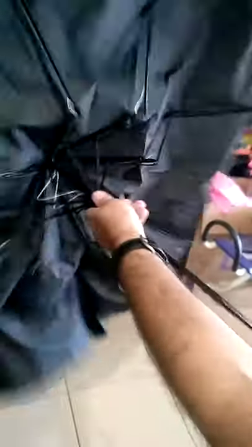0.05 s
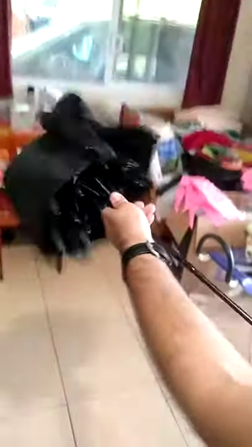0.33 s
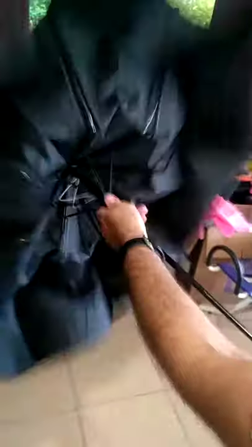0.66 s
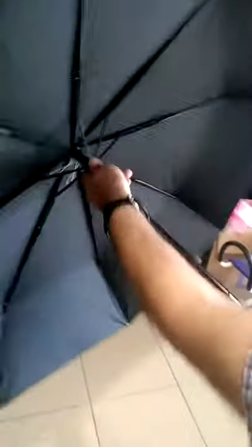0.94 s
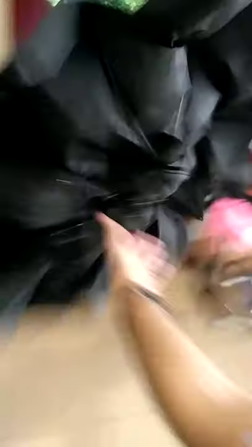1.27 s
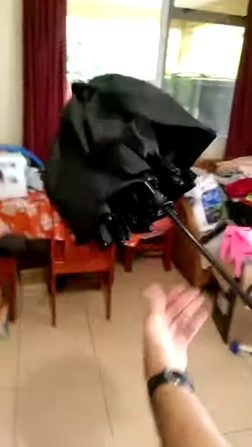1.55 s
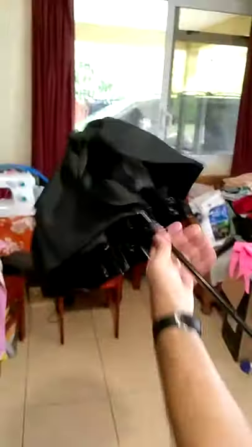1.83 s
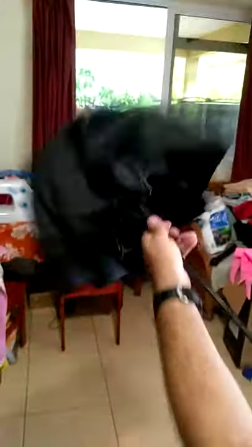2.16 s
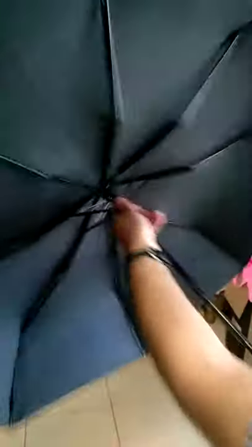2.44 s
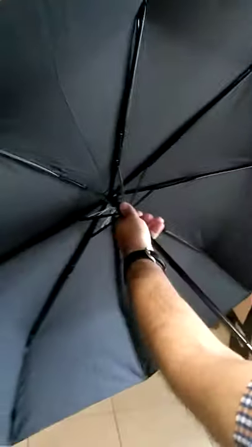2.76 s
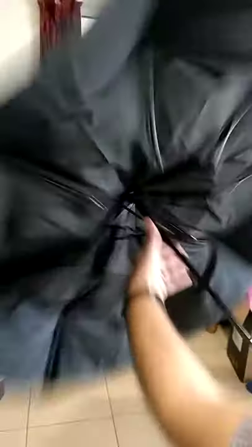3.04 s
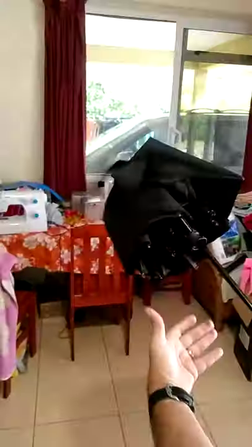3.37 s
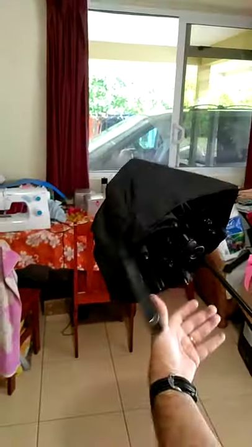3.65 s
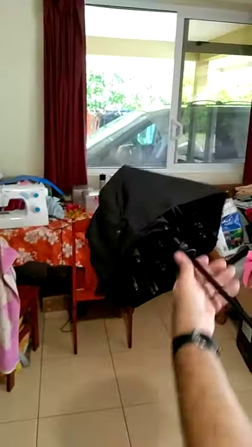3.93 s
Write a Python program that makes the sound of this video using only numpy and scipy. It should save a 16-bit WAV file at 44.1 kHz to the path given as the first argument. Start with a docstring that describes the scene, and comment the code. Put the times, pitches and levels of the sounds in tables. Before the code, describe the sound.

A folding umbrella is collapsed and pushed open repeatedly, nylon rustling and metal ribs clinking.

```python
"""A quiet room: a folding umbrella is collapsed three times and pushed open twice, at arm's length. The nylon
rubs, rasps, crumples and billows, then snaps taut and booms. The thin metal ribs clink at their joints; the
plastic runner knocks and slides on the shaft. Mains hum and faint room noise lie underneath."""
import sys
import numpy as np
from scipy import signal
from scipy.fft import rfft, irfft, next_fast_len
from scipy.io import wavfile
from scipy.ndimage import uniform_filter1d

SR = 44100
rng = np.random.default_rng(int(sys.argv[2]) if len(sys.argv) > 2 else 0)


def generate_wav(sig):
    """Save sig (samples, or channels by samples) to the path in sys.argv[1] as 16-bit PCM at SR."""
    pcm = np.round(np.clip(np.atleast_2d(sig).T, -1, 1) * 32767).astype(np.int16)
    wavfile.write(sys.argv[1], SR, pcm)


N = 176400

# Canopy movements: t/s, rub/dB, crumple/dB, billow/dB
CLOSE_1 = [(0, -33, -39, -32.5), (.1, -50, -56.5, -52.5), (.17, -49, -42.5, -46), (.22, -33.5, -38.5, -36),
           (.26, -24, -34, -42.5), (.31, -32.5, -40.5, -54), (.42, -37, -50, -63), (.47, -34, -47.5, -66)]
OPEN_1 = [(.52, -31.5, -52, -68), (.575, -28, -48, -59), (.6, -27, -42, -38), (.7, -45.5, -35.5, -40.5),
          (.755, -38.5, -40, -36.5), (.82, -69, -48.5, -44.5), (.87, -49, -47, -38.5),
          (.94, -47, -51, -41.5), (1.02, -65, -58, -53.5), (1.09, -66, -68, -57.5)]
CLOSE_2 = [(1.15, -43, -51, -55), (1.221, -40, -44.5, -34.5), (1.265, -31, -42, -41),
           (1.315, -31.5, -35.5, -41.5), (1.338, -31, -29.5, -37.5), (1.39, -27, -33.5, -37.5),
           (1.46, -37, -42, -63), (1.55, -46.5, -57, -69), (1.68, -66, -55, -59)]
GRIP_SHIFT = [(1.8, -64.5, -58, -65), (1.85, -44, -55, -59), (1.98, -58, -63.5, -64.5),
              (2.07, -50.5, -62, -66)]
OPEN_2 = [(2.13, -36, -56.5, -67), (2.23, -28.5, -50.5, -69), (2.294, -26, -42, -45.5),
          (2.306, -24.5, -32, -32), (2.36, -35.5, -33, -32), (2.407, -28.5, -35, -28.5),
          (2.45, -38.5, -39, -33), (2.501, -36.5, -48, -35), (2.6, -64, -62, -54),
          (2.69, -60.5, -67.5, -63)]
CLOSE_3 = [(2.81, -64, -68, -63), (2.86, -51, -54, -51.5), (3.029, -44.5, -62, -52.5),
           (3.073, -27, -46, -39), (3.125, -36, -32.5, -42), (3.155, -36, -32.5, -42),
           (3.191, -27.5, -33, -38.5), (3.29, -39, -46.5, -82)]
SETTLE = [(3.41, -48, -54, -73), (3.53, -44.5, -55.5, -63.5), (3.62, -49.5, -58, -61),
          (3.73, -52, -56.5, -60), (3.81, -60, -66, -59), (4, -66, -70, -84.5)]

# Panel snaps: t/s, flap/dB, crack/dB, hold/s
PANEL_SNAPS = [(0.2283, -34.5, -28.5, 0.004), (.736, -35, -41, .002), (.754, -31.5, -36, 0.0023),
               (.895, -31, -35.5, .002), (0.926, -32.5, -42, .002), (1.217, -37, -52, 0.0062),
               (1.329, -29, -25, 0.0069), (2.303, -30, -43, 0.011), (2.315, -32, -31, 0.0043),
               (2.36, -28, -33, 0.0024), (2.394, -30.5, -35.5, 0.013), (2.423, -31, -31, 0.0027),
               (2.466, -25.5, -50, 0.0022), (3.186, -39, -33.5, 0.0072)]
# Canopy booms: t/s, level/dB, f/Hz
CANOPY_BOOMS = [(0.896, -13.5, 156), (2.399, -26, 150), (2.463, -16.5, 195)]
# Canopy resonances: f/Hz, relative level/dB
BODY_MODES = [(195, -14), (381, -16.5), (663, -47), (758, -14), (1000, -36), (1376, -34), (1750, -12.5),
              (2540, -26), (3160, -8)]
# Rib joint clinks: t/s, relative level/dB, contact/s
RIB_CLINKS = [(0.0448, -27, .004), (.147, -35, 0.0032), (.118, -28, 0.0023), (.1647, -13.5, 0.0021),
              (0.1802, -13.5, .002), (0.188, -18, 0.0042), (0.243, -23.5, 0.0077), (0.4713, -24, .0025),
              (.6555, -35, 0.0022), (.731, -33, .002), (0.7623, -20, 0.0017), (.888, -27.5, 0.0042),
              (0.898, -33.5, 0.011), (1.104, -35.5, .003), (1.174, -17.5, 0.0028), (1.257, -22, 0.0049),
              (1.27, -22, 0.0046), (1.293, -17, 0.0032), (1.299, -13.5, 0.0026), (1.306, -14.5, 0.0017),
              (1.4943, -26, 0.0028), (1.851, -37.5, 0.0061), (1.9985, -41, 0.0019), (2.037, -37, 0.0038),
              (2.079, -38, 0.0023), (2.0988, -31.5, 0.0031), (2.388, -23.5, 0.0019), (2.4683, -30, .003),
              (2.479, -33, .006), (2.763, -53.5, .003), (2.868, -28, .003), (2.89, -34.5, 0.0022),
              (2.9115, -15, 0.0017), (2.93, -27, 0.0044), (3.045, -30, 0.0025), (3.069, -17.5, 0.0023),
              (3.104, -8.5, 0.0035), (3.1777, -22, 0.0041), (3.663, -48, .008)]
# Runner and handle knocks: t/s, knock/dB, ring/dB, ring f/Hz
RUNNER_KNOCKS = [(0.166, -38, -33.5, 4420), (.356, -49, -39, 2400), (.422, -39.5, -46, 2740),
                 (.735, -31, -55, 3300), (.96, -29.5, -57, 3330), (1.106, -47, -49, 930),
                 (1.186, -53, -36.5, 3370), (1.25, -36, -36, 1970), (1.8215, -51, -53, 2800),
                 (2.847, -41, -45, 3200), (2.8703, -45.5, -54, 1000), (2.912, -46, -44, 2700),
                 (2.946, -43, -52, 3000), (3.354, -56, -41, 1240)]
# Friction strokes: centre t/s, level/dB, sigma/s
RASP_STROKES = [(.27, -33, 0.083), (0.575, -39, 0.066), (1.39, -50, 0.037), (2.278, -50.5, 0.035),
                (3.197, -55.5, .05)]
RUNNER_SLIDES = [(.53, -50, 0.049), (2.145, -45, 0.034), (2.24, -46.5, 0.058), (3.54, -60.5, 0.15)]
# Hum envelope: t/s, level/dB
HUM_LEVELS = [(0, -57), (.42, -59), (.53, -69), (.7, -71), (1.0, -56.5), (1.42, -58), (1.54, -64),
              (1.65, -54.5), (1.95, -56), (2.02, -61.5), (2.2, -63), (2.6, -54.5), (3.3, -60.5),
              (3.6, -53.5), (4, -59)]

# Spectra: f/Hz, relative level/dB
RUB_SPECTRUM = [(600, -34.5), (1500, -13.5), (2900, -5), (3900, -9), (6000, -10), (7500, -7), (9300, 0),
                (11300, 0), (13000, -3), (15700, -8.5)]
CRUMPLE_SPECTRUM = [(150, -12.5), (400, -6), (750, -3), (1050, 1), (1500, -2.5), (2200, -3.5), (3100, -5.5),
                    (4200, -13.5), (7000, -17.5), (15000, -14.5)]
BILLOW_SPECTRUM = [(35, -28), (70, -9.5), (120, -4), (195, -1.5), (280, -1.5), (380, -4.5), (520, -11),
                   (1000, -13), (3000, -51.5)]
PANEL_SPECTRUM = [(30, -29), (60, 5), (130, 0.5), (260, 1.5), (550, -6.5), (950, -0.5), (1600, -18),
                  (3000, -15.5), (6000, -41), (15000, -43)]
CLINK_SPECTRUM = [(500, -27), (2000, -24), (3200, -17.5), (4500, -13.5), (7000, -13.5), (8600, -0.5),
                  (9800, -3), (11100, 2), (13000, 1.5), (15700, -4.5)]
KNOCK_SPECTRUM = [(100, -10), (400, -6), (1000, 1), (1500, -10), (3300, -4), (5000, -10), (7000, -9.5),
                  (15000, -14.5)]
SCRAPE_SPECTRUM = [(1000, -14.5), (2200, -14), (4000, -6.5), (6000, 0), (8300, 6.5), (11000, -7.5),
                   (15500, -3)]
SHAFT_SPECTRUM = [(800, -26), (1500, -18), (2100, -3.5), (2800, 0.5), (3300, 1.5), (4000, -7), (8000, -36)]
REVERB_SPECTRUM = [(80, 0.5), (200, 1), (900, 0.5), (1700, 4.5), (3000, -2), (4200, -6), (6500, -1),
                   (9500, 4.5), (12000, -2.5), (15500, -1)]
AIR_SPECTRUM = [(25, -9), (70, 1), (200, 7.5), (500, -13), (2500, -7.5), (5000, -43), (10000, -16),
                (16000, -26)]


def cloth(trim_db=-0.5):
    """Moving nylon slips on itself, creases and flaps in many tiny events."""
    times_s, *levels_db = np.transpose(CLOSE_1 + OPEN_1 + CLOSE_2 + GRIP_SHIFT
                                       + OPEN_2 + CLOSE_3 + SETTLE)
    t = np.arange(N) / SR
    rub, crumple, billow = [from_db(np.interp(t, times_s, db) + trim_db) for db in levels_db]
    slips = grains(per_s=7000, spread_db=4.5, smooth_db=2)
    creases = grains(per_s=900, spread_db=3, smooth_db=-3)
    flaps = grains(per_s=220, spread_db=1, smooth_db=-0.5)
    return (coloured(rub * slips, RUB_SPECTRUM)
            + coloured(crumple * creases, CRUMPLE_SPECTRUM)
            + coloured(billow * flaps, BILLOW_SPECTRUM))


def panel_snaps(fall_s=0.0017):
    """Panels snap as they fill: a low flap plus a crisp crack."""
    flaps, cracks = np.zeros((2, N))
    t = np.arange(SR // 5) / SR
    for start_s, flap_db, crack_db, hold_s in PANEL_SNAPS:
        add(flaps, start_s, from_db(flap_db) * burst(t, hold_s, fall_s))
        add(cracks, start_s, from_db(crack_db) * burst(t, hold_s, fall_s))
    return coloured(flaps, PANEL_SPECTRUM) + coloured(cracks, CRUMPLE_SPECTRUM)


def canopy_booms(attack_s=0.0045, t60_s=0.05):
    """The taut canopy booms like a drum."""
    out, t = np.zeros(N), np.arange(SR // 5) / SR
    envelope = (1 - np.exp(-t / attack_s)) * from_db(-60 * t / t60_s)
    for start_s, db, hz in CANOPY_BOOMS:
        add(out, start_s, -from_db(db) * envelope * np.sin(2 * np.pi * hz * t))
    return out


def canopy_body(x, mix_db=-23):
    """Resonances of the canopy on its frame colour the cloth."""
    modes = sum(from_db(db) * ring(x, hz, t60_s=0.026) for hz, db in BODY_MODES)
    return x + from_db(mix_db) * modes


def rib_clinks(rise_s=0.0006, chatter_db=-15, chatter_fall_s=0.015, ring_db=-7, trim_db=-1.5):
    """Metal joints: a brief scrape and dying bounces excite each rib's own damped ring."""
    out, t = np.zeros(N), np.arange(SR // 6) / SR
    for start_s, db, hold_s in RIB_CLINKS:
        bounces = grains(per_s=600, spread_db=1, smooth_db=-7, size=len(t))
        scrape = burst(t, hold_s, fall_s=0.0008) * (1 - np.exp(-t / rise_s))
        contact = scrape + from_db(chatter_db) * bounces * np.exp(-t / chatter_fall_s)
        ring_hz = 10460 * np.exp(rng.uniform(-0.11, 0.1))
        clink = contact + from_db(ring_db) * ring(contact, ring_hz, t60_s=0.0017)
        add(out, start_s, from_db(db + trim_db) * clink)
    return coloured(out, CLINK_SPECTRUM)


def runner_knocks():
    """Runner and handle: dry plastic knocks, one damped ring each."""
    out, t = np.zeros(N), np.arange(SR // 10) / SR
    for start_s, knock_db, ring_db, ring_hz in RUNNER_KNOCKS:
        contact = burst(t, hold_s=0, fall_s=0.0099)
        knock = from_db(knock_db) * coloured(contact, KNOCK_SPECTRUM)
        add(out, start_s, knock + from_db(ring_db) * ring(contact, ring_hz, t60_s=0.006))
    return out


def cloth_rasp():
    """The nylon rasps on itself in small catches."""
    catches = grains(per_s=520, spread_db=-1.5, smooth_db=0)
    return coloured(swells(RASP_STROKES) * catches, SCRAPE_SPECTRUM)


def runner_slides():
    """The runner drags along the shaft in fine, dense catches."""
    catches = grains(per_s=3600, spread_db=1.5, smooth_db=1)
    return coloured(swells(RUNNER_SLIDES) * catches, SHAFT_SPECTRUM)


def room(x, first_echo_s=0.0028, t60_s=0.39):
    """Diffuse reverberation of a tiled living room."""
    t = np.arange(SR) / SR
    envelope = (t > first_echo_s) * from_db(-60 * t / t60_s)
    tail = coloured(envelope * rng.standard_normal(SR), REVERB_SPECTRUM)
    return signal.fftconvolve(x, tail / np.linalg.norm(tail))[:N]


def background(hum_hz=61.5, air_db=-64.5):
    """Wavering mains hum and faint room noise."""
    t = np.arange(N) / SR
    hum_db = np.interp(t, *np.transpose(HUM_LEVELS))
    hum = from_db(hum_db) * unit_rms(np.sin(2 * np.pi * hum_hz * t))
    return hum + from_db(air_db) * coloured(rng.standard_normal(N), AIR_SPECTRUM)


def grains(per_s, spread_db, smooth_db, size=N):
    """Random clicks of unequal size on smooth noise; rms 1."""
    clicks = (rng.random(size) < per_s / SR) * rng.choice([-1, 1], size)
    gains = from_db(spread_db * np.minimum(rng.exponential(1, size), 4))
    return unit_rms(unit_rms(clicks * gains) + from_db(smooth_db) * rng.standard_normal(size))


def burst(t, hold_s, fall_s):
    """Dense micro-contacts: hold, then exponential decay."""
    return rng.choice([-1, 1], len(t)) * np.exp(-np.maximum(t - hold_s, 0) / fall_s)


def swells(strokes):
    """Gain curve, one Gaussian per stroke."""
    t = np.arange(N) / SR
    return sum(from_db(db) * np.exp(-0.5 * ((t - centre_s) / sigma_s) ** 2)
               for centre_s, db, sigma_s in strokes)


def coloured(x, spectrum):
    """Minimum-phase filter; white noise keeps its power."""
    size = next_fast_len(len(x) + SR // 10, real=True) * 2
    hz, db = np.transpose(spectrum)
    bins_hz = np.fft.rfftfreq(size, 1 / SR)
    gain = unit_rms(from_db(np.interp(np.log(bins_hz + 1), np.log(hz), db)))
    cepstrum = irfft(np.log(gain))
    cepstrum[1:size // 2] *= 2  # fold onto positive time
    cepstrum[size // 2 + 1:] = 0
    return irfft(rfft(x, size) * np.exp(rfft(cepstrum)))[:len(x)]


def ring(x, hz, t60_s):
    """Two-pole resonator; white noise keeps its power."""
    radius, angle_rad = from_db(-60 / (t60_s * SR)), 2 * np.pi * hz / SR
    gain = np.sqrt((1 - radius ** 2) / 2)
    return signal.lfilter([gain, 0, -gain], [1, -2 * radius * np.cos(angle_rad), radius ** 2], x)


def add(out, start_s, sound):
    """Mix in place from start_s."""
    i = int(start_s * SR)
    out[i:i + len(sound)] += sound[:N - i]


def from_db(db):
    """Decibels to gain."""
    return 10 ** (np.asarray(db) / 20)


def unit_rms(x):
    """Scale to rms 1."""
    return x / np.sqrt(np.mean(x ** 2) + 1e-20)


def scene(rustle_send_db=-12.5, clatter_send_db=-7.5):
    """Umbrella, reverberation and background; mono."""
    canopy = canopy_body(cloth() + panel_snaps() + canopy_booms())
    rustle = canopy + cloth_rasp() + runner_slides()
    clatter = rib_clinks() + runner_knocks()
    reverb = room(from_db(rustle_send_db) * rustle + from_db(clatter_send_db) * clatter)
    return (rustle + clatter + reverb + background())[None]


def record(dry, band_hz=(3730, 7700), threshold_db=-60.5, depth_db=-2.5, cutoff_hz=15900):
    """A noise suppressor lowers one band while it is faint; a steep low-pass follows."""
    band = signal.sosfiltfilt(signal.butter(2, band_hz, "band", fs=SR, output="sos"), dry)
    power = np.abs(uniform_filter1d(band ** 2, size=SR // 50))
    faintness = 1 / (1 + power / from_db(threshold_db) ** 2)
    quieted = dry - (1 - from_db(depth_db)) * faintness * band
    return signal.sosfilt(signal.ellip(12, 0.1, 80, cutoff_hz, fs=SR, output="sos"), quieted)


dry = scene()
out = record(dry)
generate_wav(out)
```